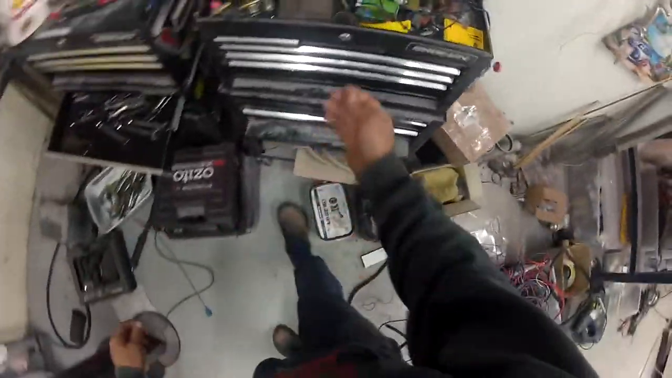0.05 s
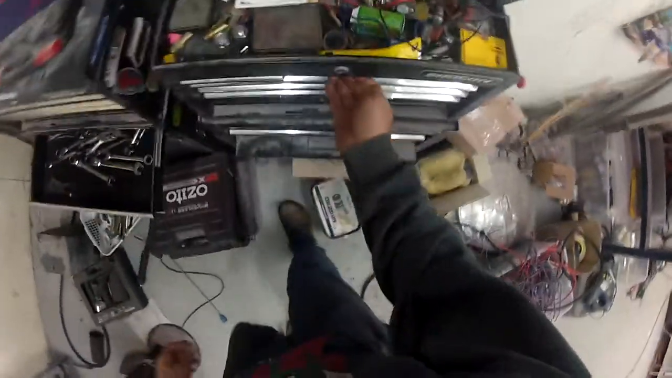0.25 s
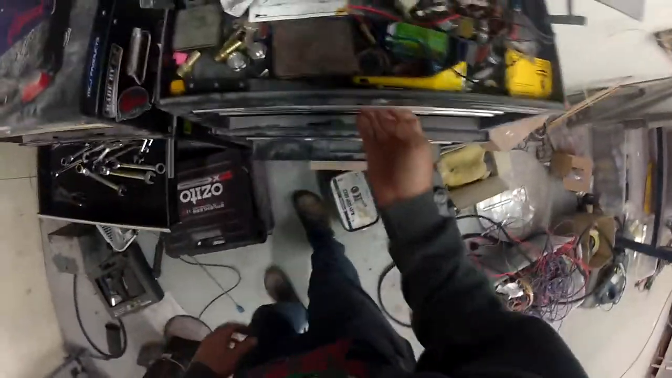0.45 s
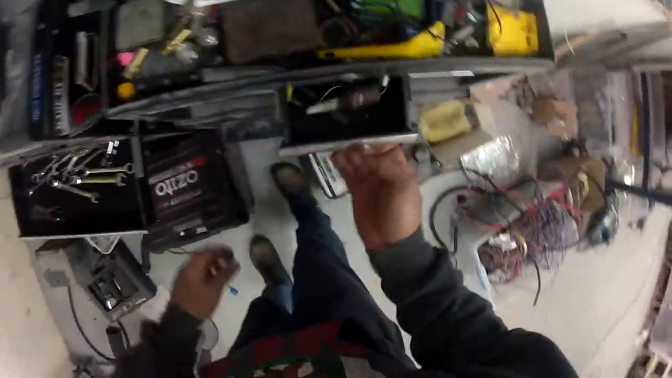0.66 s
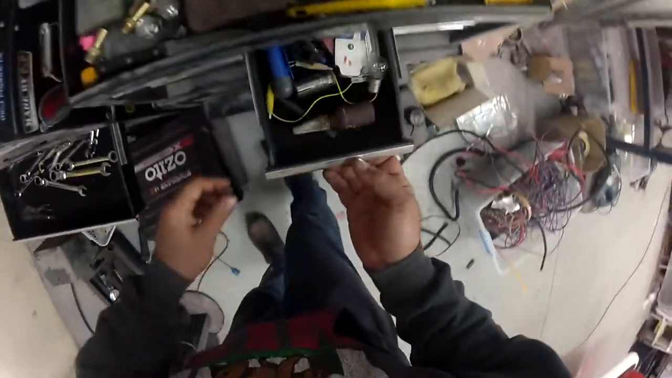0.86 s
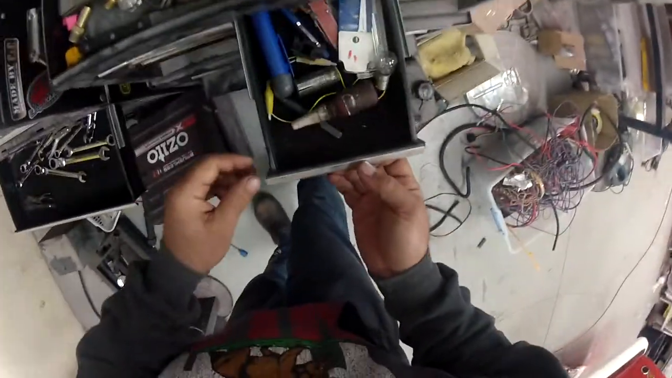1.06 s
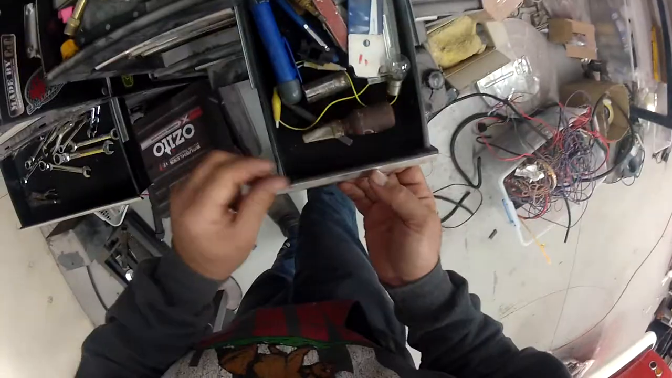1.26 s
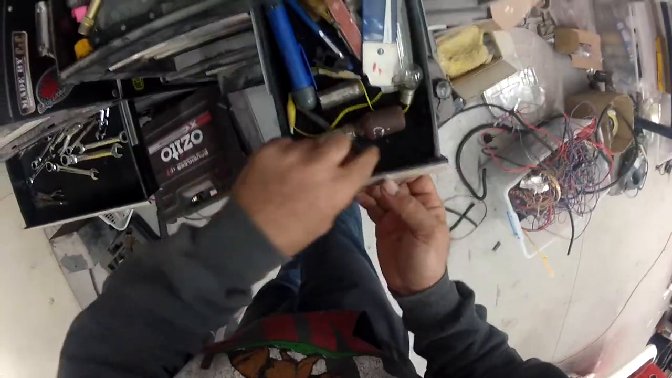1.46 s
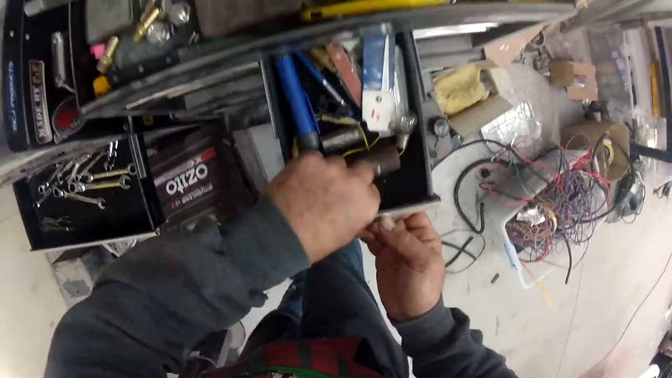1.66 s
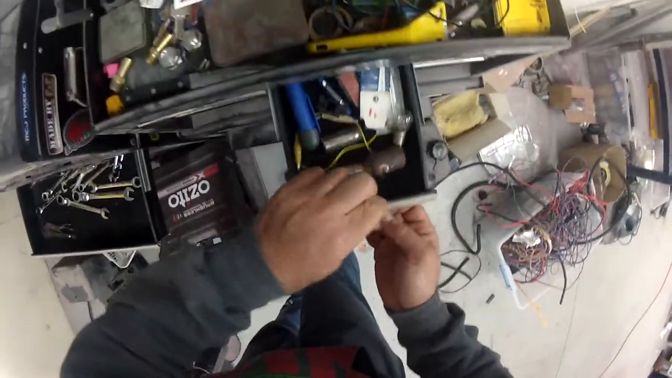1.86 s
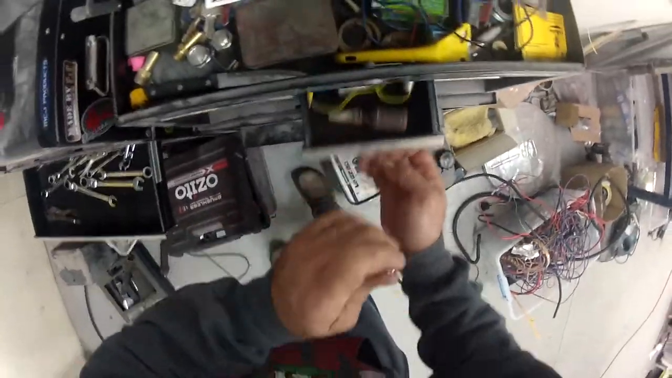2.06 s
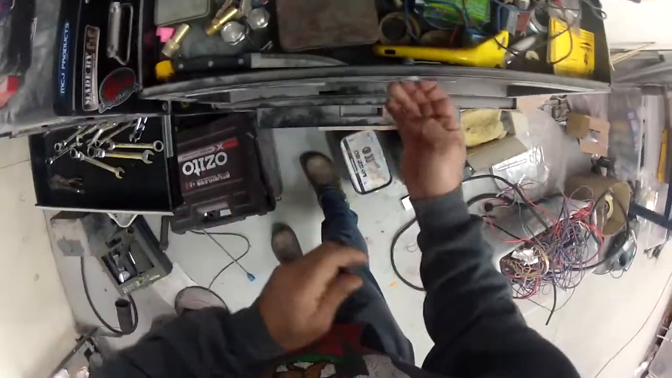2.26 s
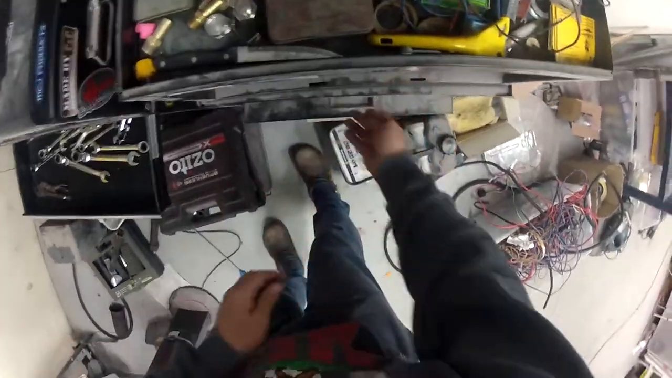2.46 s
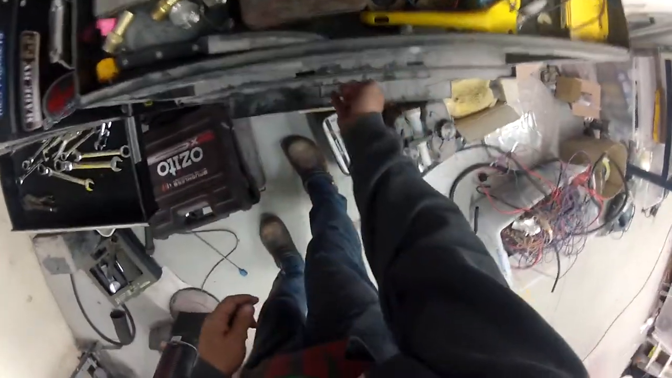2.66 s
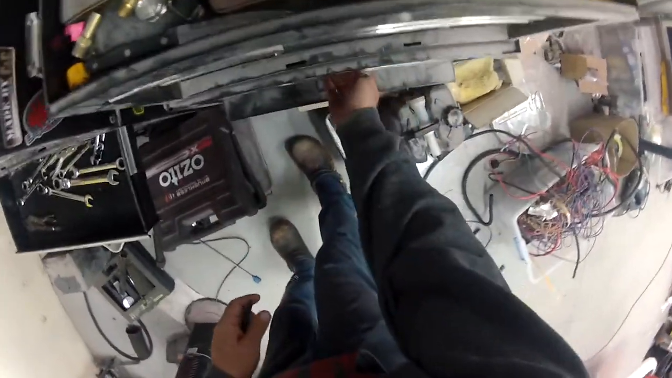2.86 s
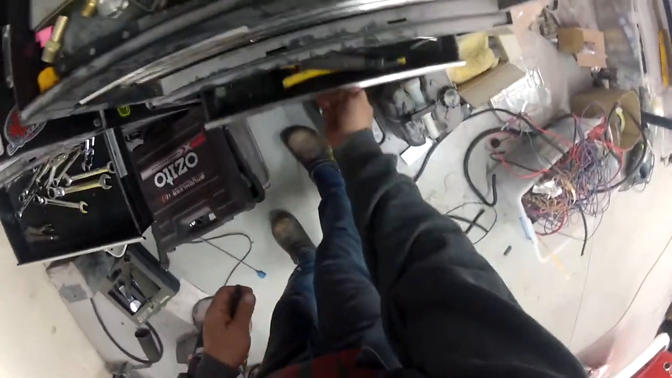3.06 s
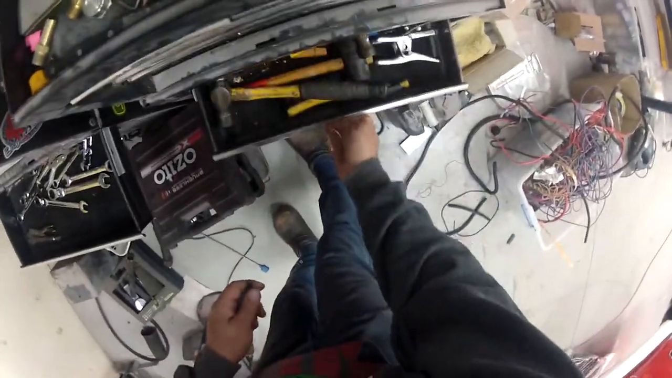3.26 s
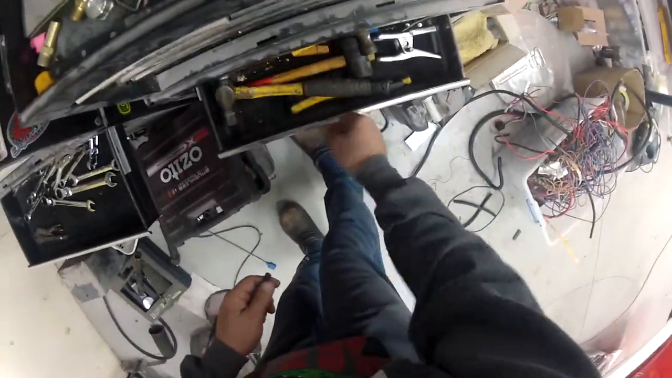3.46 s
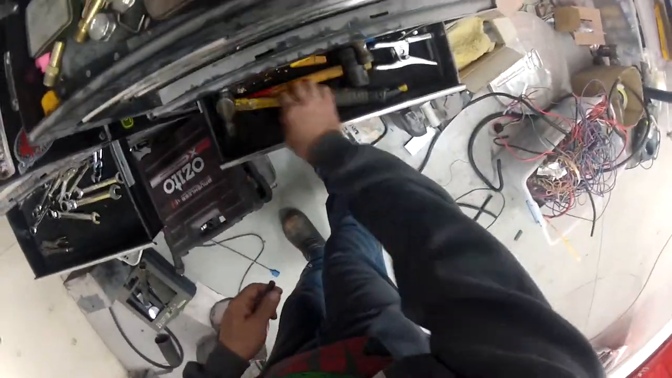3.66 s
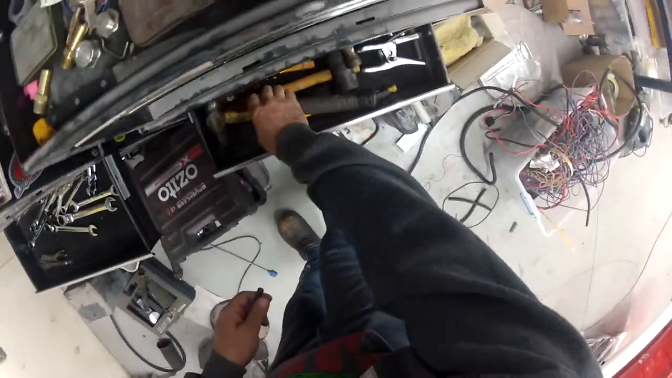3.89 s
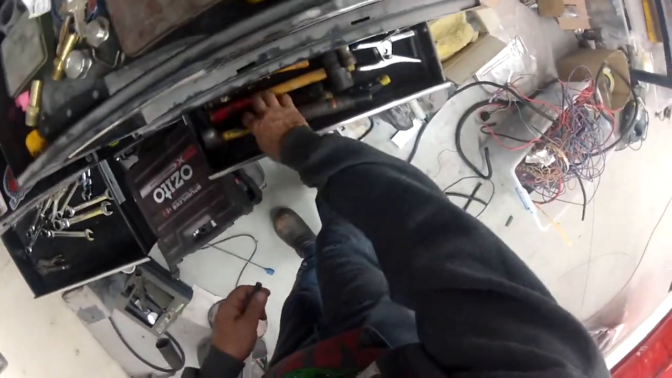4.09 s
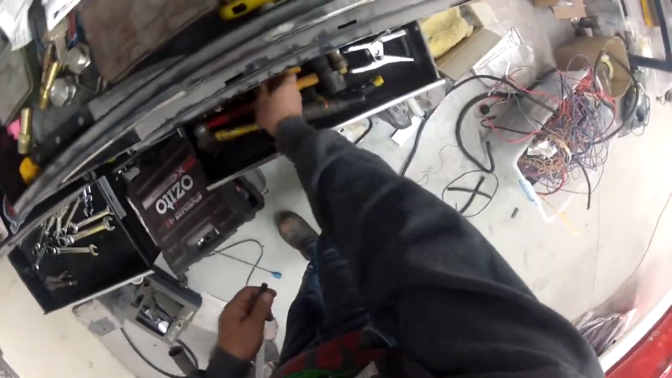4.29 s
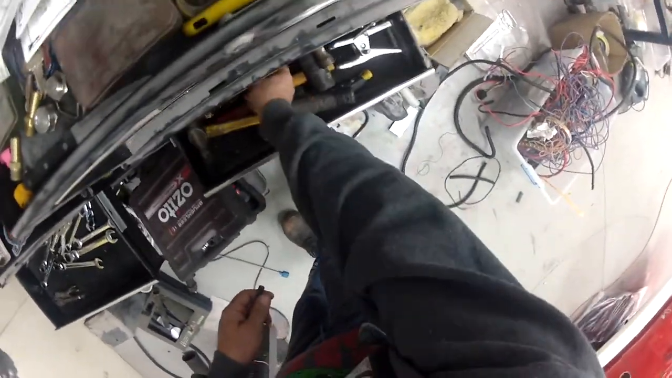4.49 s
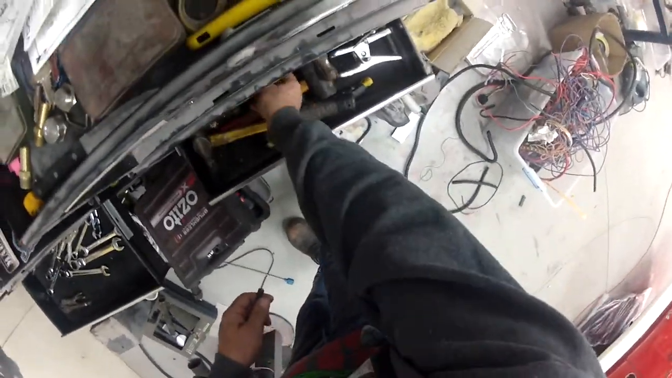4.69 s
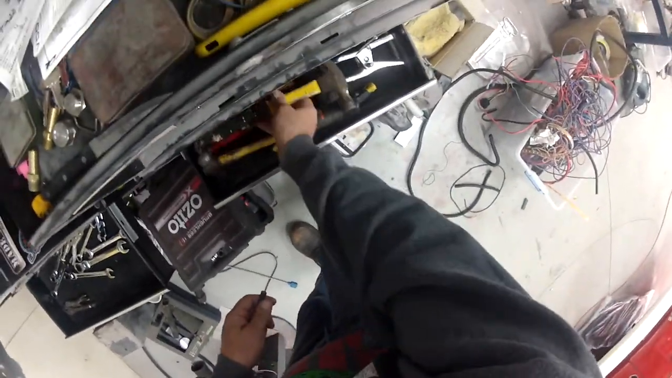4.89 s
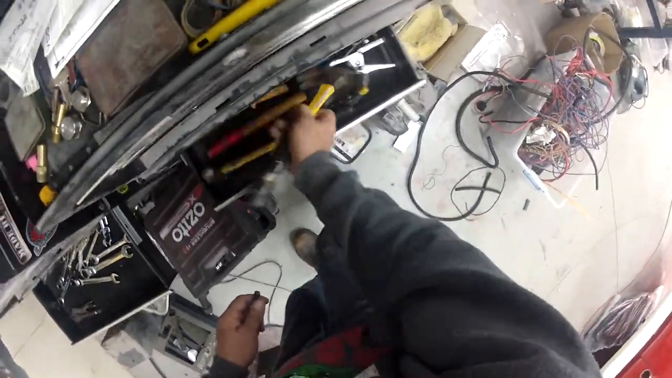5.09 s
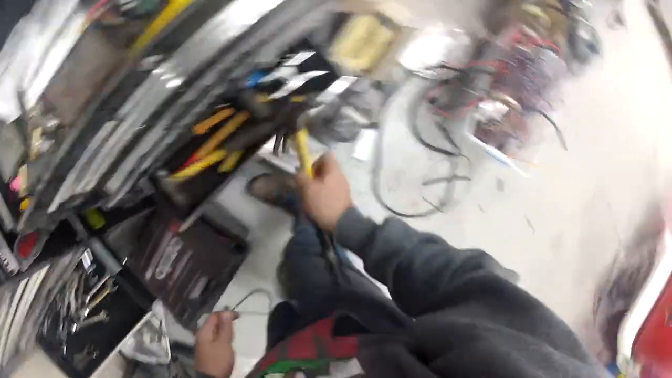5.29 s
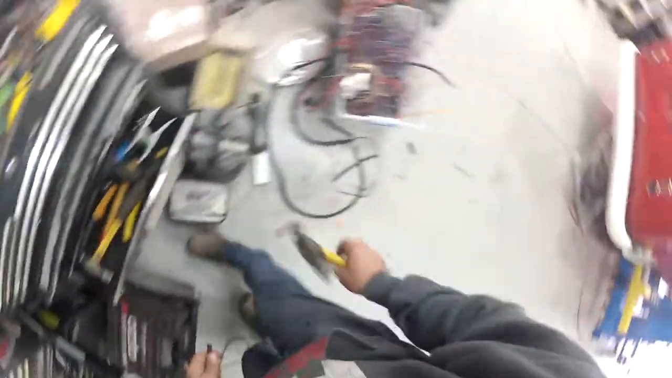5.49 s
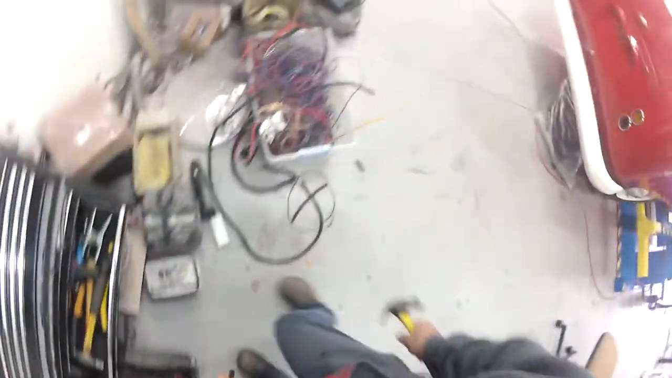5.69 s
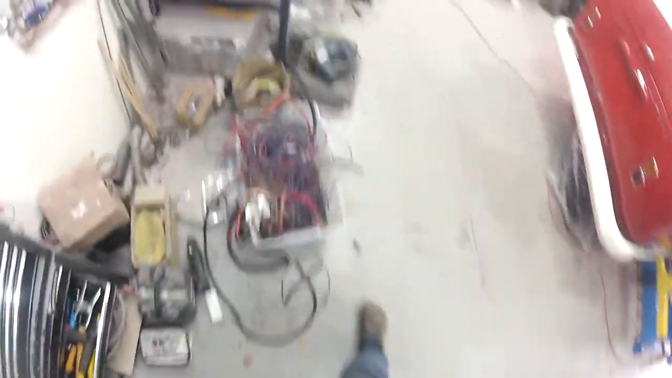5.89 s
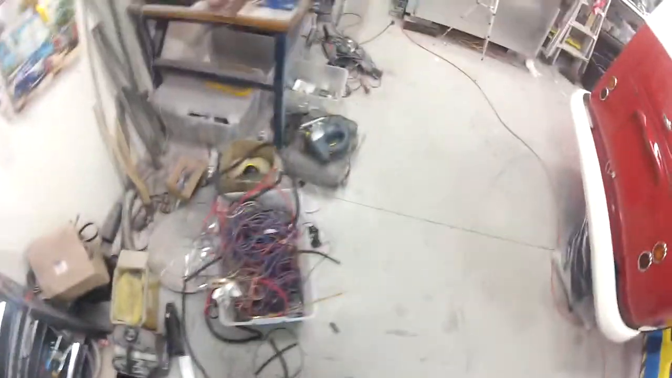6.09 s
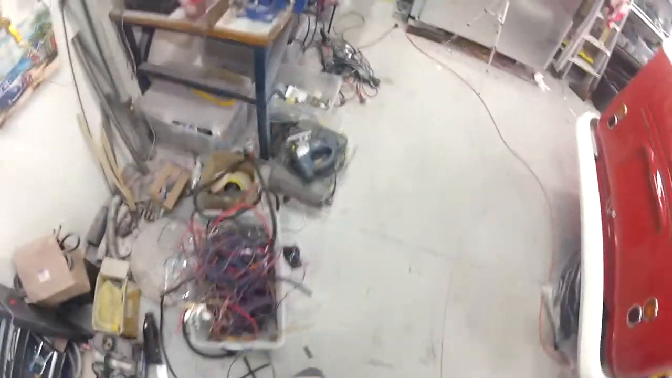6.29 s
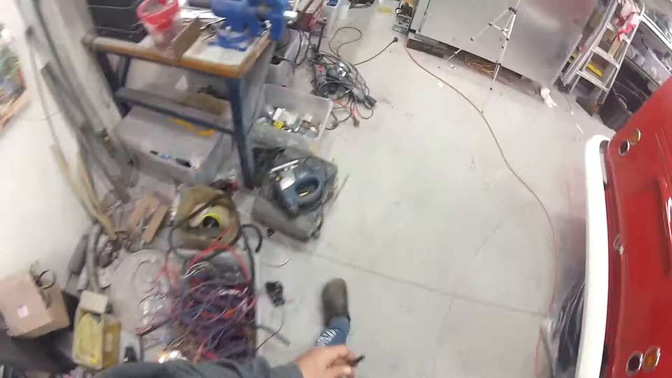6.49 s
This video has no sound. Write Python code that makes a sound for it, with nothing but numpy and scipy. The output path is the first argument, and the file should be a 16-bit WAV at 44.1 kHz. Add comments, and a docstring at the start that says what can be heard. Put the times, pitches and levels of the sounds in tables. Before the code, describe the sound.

Metal drawers roll and bang in a workshop, and hand tools knock and ring as someone rummages through them.

```python
"""Steel tool chest in a workshop

At the chest, within arm's reach: a small drawer rolls out on ticking ball runners, is searched and slams. A
wide drawer below rolls out, hammers knock about in it and one is lifted out; a shoe scuffs the floor. Each blow
thuds and sets sheet steel and tools ringing. The microphone is in a head-worn camera, which keeps only the band
below about 5.3 kHz and whose coarse sampling adds a glassy top."""
import sys
import numpy as np
from scipy import signal
from scipy.fft import rfft, irfft, next_fast_len
from scipy.io import wavfile

SR = 44100
rng = np.random.default_rng(int(sys.argv[2]) if len(sys.argv) > 2 else 0)


def wav_out(sig):
    """Save sig, one row per channel (or a flat mono array), as 16-bit PCM at SR to the path in sys.argv[1]."""
    wavfile.write(sys.argv[1], SR, np.round(np.clip(np.atleast_2d(sig).T, -1, 1) * 32767).astype(np.int16))


N = 288546

# Spectra, as relative level per hertz: f/Hz, level/dB
AIR_SPECTRUM = [(18, -51.5), (30, -6.5), (278, 2), (492, -8), (799, -11), (1330, -16.5), (1690, -25),
                (1800, -20.5), (1930, -17), (2060, -20), (5800, -26.5), (7540, -58), (12800, -120)]
HANDLING_SPECTRUM = [(40, -12), (95, -2), (200, -20.5), (400, -22), (900, -26.5), (2000, -55.5)]
SWISH_SPECTRUM = [(150, -5), (500, 4.5), (1100, -7), (1700, -8), (2400, 3.5), (3300, -3.5), (4600, -2.5),
                  (5800, -3.5)]
SMALL_TRAY_SPECTRUM = [(60, -46), (110, -13.5), (160, -23.5), (205, 2.5), (290, -22), (400, -3),
                       (510, -11.5), (690, 3.5), (830, -2), (1000, -17.5), (1150, -18.5), (1500, -31.5),
                       (2500, -58.5)]
WIDE_TRAY_SPECTRUM = [(26, -14), (45, -45), (87, -2), (134, -8.5), (176, 7.5), (219, 0.5), (253, -2.5),
                      (418, -4), (599, -2.5), (672, 2.5), (776, -9), (909, -19.5), (1400, -36.5),
                      (1820, -88), (3080, -120)]
GRIT_SPECTRUM = [(700, -11), (1000, -4.5), (1300, 0.5), (1800, 6), (2800, 4.5), (4200, 0), (5800, -2)]
KNOCK_SPECTRUM = [(45, -20), (70, -38.5), (100, 2), (170, -5), (240, -5), (380, 2.5), (480, 1), (720, 4),
                  (880, -12.5), (1100, -14), (1700, -16), (2900, -16.5), (4200, -21.5), (5800, -22)]
# Movements: start/s, rise/s, hold/s, fall/s, level/dB
CAMERA_SHIFTS = [(4.4, 0.19, 0.49, .08, -54.5), (5.33, 0.046, 0.2, 0.055, -46),
                 (5.68, 0.018, 0.04, 0.11, -52.5), (5.96, 0.064, 0.099, 0.03, -49),
                 (6.35, 0.07, 0.047, 0.042, -67)]
SLEEVE_AND_SHOE_MOVES = [(0.509, 0.027, 0.025, 0.016, -41), (1.5, .08, 0.2, 0.06, -72),
                         (3.9, 0.04, 0.18, .05, -70), (5.153, 0.11, 0.032, 0.045, -54.5),
                         (5.65, 0.061, 0.16, .05, -73.5), (5.86, 0.11, 0.072, 0.035, -66.5),
                         (6.050, 0.0025, 0.0061, 0.053, -49), (6.25, 0.071, 0.12, 0.054, -72),
                         (6.473, 0.058, .03, .03, -62.5)]
SMALL_DRAWER_PUSHES = [(.44, 0.036, 0.17, 0.035, -47.5), (.62, 0.043, .13, 0.067, -43.5),
                       (.92, 0.018, 0.088, 0.11, -46), (1.6, 0.084, 0.11, 0.038, -60.5),
                       (1.77, 0.063, 0.36, 0.014, -42)]
WIDE_DRAWER_PUSHES = [(2.93, 0.036, 0.052, 0.047, -32.5), (3.04, 0.086, 0.05, 0.12, -27)]
# Ring time of chest and room: f/Hz, t60/s
RING_T60 = [(60, 0.56), (200, 0.86), (560, 0.55), (1400, 0.42), (3000, 0.42), (5500, 0.38)]
# Modes of the drawer panels, the knocked tools and one loose tool: f/Hz, level/dB, t60/s
PANEL_MODES = [(98, -6, .8), (114, -7, .7), (169, -3, 1.0), (194, -4, 1.0), (243, -3, .8), (305, -4, .7),
               (353, -10, .8), (385, -6, .6), (555, -8, .9), (730, -5, .7), (930, -14, .5)]
TOOL_MODES = [(1291, -4, .6), (1449, -6, .5), (1927, -6, .5), (2336, -5, .6), (2694, 2, .6), (2815, -4, .5),
              (2998, -5, .5), (3161, -6, .6), (3771, -5, .6)]
LOOSE_TOOL_MODES = [(2280, -9, 0.25), (2460, 1, 0.083), (2460, -11, 0.18), (2720, -13, 0.22),
                    (2830, -10, 0.19), (3004, -3.5, 0.34), (3050, -10, 0.33)]
# Touches on a loose tool: t/s, level/dB, pitch ratio
TOOL_TOUCHES = [(0.24, -53.5, 1.005), (4.112, -50.5, .88)]
# Knocks of drawers and tools: t/s, level/dB, thud f/Hz, hardness (clank over level)/dB, clank f/Hz, ring/dB
KNOCKS = [ (.096, -50, 640, -6, 2500, -8.5), (.163, -30, 421, -10, 1940, -21),
          (0.168, -43, 107, -11, 1940, -14), (.24, -67, 600, 10.5, 2700, -3),
          (.463, -35.5, 303, -15.5, 2600, -7.5), (.490, -39, 384, -14, 2700, -19),
          (.737, -33.5, 756, -7, 1260, -15), (.778, -36, 737, -26, 1300, -25),
          (.868, -12, 331, -9, 900, -20), (1.267, -57, 593, 15, 2700, -41),
          (1.452, -24.5, 503, -10, 2480, -18.5), (1.793, -38, 402, -11, 1060, -7),
          (1.898, -42.5, 705, 7.5, 4130, -31), (2.121, -19, 812, -4, 1200, -20),
          (2.126, -20, 336, -11.5, 1050, -20), (2.161, -19, 62, 2, 1000, -30),
          (2.162, -10, 398, -12, 930, -11.5), (2.164, -16, 807, 0, 3000, -22),
          (2.187, -19, 323, -15, 2700, -12), (2.268, -23, 371, -13, 2650, -13),
          (2.300, -17.5, 342, -13.5, 2940, -6.5), (2.596, -45.5, 296, -15.5, 2980, -5.5),
          (2.669, -42, 398, -23, 2640, 5.5), (2.837, -27.5, 304, -19.5, 2500, -6),
          (2.956, -31, 489, -18.5, 2400, -11), (3.160, -28, 169, -10.5, 2500, -7),
          (3.867, -36, 224, -22, 2320, -4.5), (4.098, -35, 175, -23, 2620, 0.5),
          (4.115, -41.5, 428, -20.5, 2580, -0.5), (4.340, -45, 300, -18, 4540, -11),
          (4.441, -25.5, 557, 3, 2660, -19), (4.445, -34, 87, -24, 2680, 3),
          (4.450, -20.5, 483, -13, 2660, -10), (4.712, -39, 416, -18, 2700, -11),
          (4.734, -12.5, 260.4, -29.5, 2200, -8.5), (4.853, -27, 535, -19.5, 3080, -12.5),
          (4.873, -18, 241, -26, 2550, -11.5), (4.910, -23.5, 535, -20, 2530, -10.5),
          (4.956, -26.5, 197, -14.5, 2500, -5), (5.372, -32, 644, 2, 2900, -7.5),
          (5.38, -23, 98, -25, 2220, -17), (5.392, -18.5, 648, -14.5, 2000, -10),
          (5.412, -22.5, 560, 2, 2000, -19), (5.528, -33.5, 102, -14, 2700, -4),
          (5.755, -53.5, 203, 8.5, 3690, -23), (5.795, -55, 200, 6, 3750, -25),
          (6.38, -36.5, 232, -13.5, 2260, -15.5)]

BAND_EDGES_HZ = 40 * 2 ** (np.arange(23) / 3)
BANDS_HZ = np.sqrt(BAND_EDGES_HZ[1:] * BAND_EDGES_HZ[:-1])
TIME = np.arange(N) / SR


def from_db(db):
    """Decibels to gain."""
    return 10 ** (np.asarray(db) / 20)


def rms_one(x):
    """Scale each row to rms 1."""
    return x / np.sqrt(np.mean(x ** 2, axis=-1, keepdims=True) + 1e-20)


def at_hz(points, hz):
    """Read a table on a log-frequency axis."""
    f, value = np.transpose(points)
    return np.interp(np.log(hz), np.log(f), value)


def add(out, start_s, sound):
    """Mix a sound in at a time."""
    i = max(0, int(start_s * SR))
    out[i:i + len(sound)] += sound[:max(0, N - i)]


def band_noise(size):
    """Third-octave bands of noise, rms 1 each."""
    white = rng.standard_normal((2, size))
    bank = [signal.butter(2, edges, "band", fs=SR, output="sos").repeat(2, axis=0)
            for edges in zip(BAND_EDGES_HZ, BAND_EDGES_HZ[1:])]
    return rms_one(np.array([signal.sosfilt(sos, white[k % 2]) for k, sos in enumerate(bank)]))


def coloured(x, spectrum):
    """Give a steady texture a spectrum that falls away steeply past its last point; rms 1."""
    size = next_fast_len(N)
    hz = np.arange(size // 2 + 1) * SR / size + 1
    gain = from_db(at_hz(spectrum, hz)) / (1 + (hz / spectrum[-1][0]) ** 8)
    return rms_one(irfft(rfft(x, size) * gain, size)[:N])


def grains(per_s, spread_db):
    """Tiny contacts of uneven size at random moments."""
    sizes = from_db(spread_db * np.minimum(rng.exponential(1, N), 4)) * rng.choice([-1, 1], N)
    return sizes * (rng.random(N) < per_s / SR)


def strokes(moves, power=1):
    """Gain of movements that gather, hold and coast to rest, growing as a power of their speed."""
    gain = np.zeros(N)
    for start, rise, hold, fall, db in moves:
        gather = np.clip((TIME - start) / rise, 0, 1)
        coast = np.exp(-np.maximum(TIME - start - rise - hold, 0) / fall)
        gain += from_db(db) * (gather * coast) ** power
    return gain


def ring_shape(build_s):
    """Per band, a diffuse ring builds up and dies within a second; lows last longest."""
    t = TIME[:SR]
    return (1 - np.exp(-t / build_s)) * from_db(-60 * t / at_hz(RING_T60, BANDS_HZ)[:, None])


def ringing(modes, rise_s):
    """One decaying sine per mode, a second long."""
    hz, db, t60 = np.transpose(modes)[:, :, None]
    t = TIME[:SR]
    return from_db(db - 60 * t / t60) * np.sin(2 * np.pi * hz * t) * (1 - np.exp(-t / rise_s))


def room_air():
    """Room tone: the quiet, steady air of the workshop."""
    return from_db(-64.5) * coloured(rng.standard_normal(N), AIR_SPECTRUM)


def workshop(direct, wet_db):
    """Sound reaches the microphone directly, followed by the diffuse ring of the room."""
    tails = band_noise(2 * SR)[:, SR:] * ring_shape(build_s=0.0082)
    response = np.sqrt(np.diff(BAND_EDGES_HZ)) @ tails
    response *= np.sqrt(2 * BAND_EDGES_HZ[-1] / SR / np.sum(response ** 2))
    return direct + from_db(wet_db) * signal.fftconvolve(direct, response)[:N]


def camera_handling(resting_db=-67):
    """Right at the microphone, the camera stirs faintly and shifts as its wearer straightens and walks."""
    thumps = coloured(grains(per_s=340, spread_db=4), HANDLING_SPECTRUM)
    return (from_db(resting_db) + strokes(CAMERA_SHIFTS)) * thumps


def sleeve_and_shoe():
    """Rubbing surfaces catch and slip thousands of times a second."""
    return strokes(SLEEVE_AND_SHOE_MOVES) * coloured(grains(per_s=5900, spread_db=4), SWISH_SPECTRUM)


def loose_tool():
    """A light touch leaves a loose tool ringing freely; longer tools ring lower."""
    out = np.zeros(N)
    for start_s, db, pitch_ratio in TOOL_TOUCHES:
        modes = np.array(LOOSE_TOOL_MODES) * [pitch_ratio, 1, 1]
        add(out, start_s, from_db(db) * ringing(modes, rise_s=0.0049).sum(axis=0))
    return out


def drawer(pushes, tray_spectrum, grit_db, per_s, spread_db):
    """Balls tick along the runners and tools jiggle; these contacts shake the tray and give a gritty top."""
    contacts = grains(per_s, spread_db)
    rumble = strokes(pushes) * coloured(contacts, tray_spectrum)
    grit = strokes(pushes, power=1.17) * coloured(contacts, GRIT_SPECTRUM)
    return rumble + from_db(grit_db) * grit


def hammer_nudges(count=6, span_s=(4.5, 4), hardness_db=-15, clank_hz=4380, ring_db=-18):
    """The searching hand nudges hammers at random: light blows, as rows like those of KNOCKS."""
    slots = np.linspace(*span_s, count + 1)
    when, force, pitch = rng.random((count, 3)).T
    times = slots[:-1] + when * np.diff(slots)
    levels_db = -49 + 3 * (2 * force - 1)
    thuds_hz = 293 * 2 ** (0.6 * (2 * pitch - 1))
    return [(*nudge, hardness_db, clank_hz, ring_db) for nudge in zip(times, levels_db, thuds_hz)]


def by_register(hz, boom, panel, clank):
    """Pick a value by pitch: cabinet boom below, drawer panels between, clank of tools above."""
    return np.interp(np.log(hz), np.log([230, 330, 850, 1200]), [boom, panel, panel, clank])


def steel_bands():
    """Band gains of struck steel, with each register brought to about unit power."""
    power = from_db(at_hz(KNOCK_SPECTRUM, BANDS_HZ)) ** 2 * np.diff(BAND_EDGES_HZ)
    register_db = 10 * np.log10(np.bincount(np.digitize(BANDS_HZ, [280, 1000]), power))
    return np.sqrt(power) / from_db(by_register(BANDS_HZ, *register_db))


def excitation_db(hz, db, thud_hz, hardness_db, lowest_hz):
    """How strongly a blow drives each pitch: heavy ones boom, hard ones clank, small parts lack bass."""
    weight_db = 5 * np.log2(310 / thud_hz)
    cushion_db = 0.67 * max(-20 - hardness_db, 0)   # a soft contact, as of a rubber handle, spares the panels
    boom_db = db + min(weight_db, 0)
    panel_db = db - max(weight_db, 0) - cushion_db
    bass_loss_db = 10 * np.log10(1 + (lowest_hz / hz) ** 6)
    return by_register(hz, boom_db, panel_db, db + hardness_db) - bass_loss_db


def near(hz, octaves=0.19):
    """Band weights, 0-1, around a pitch that a struck part favours."""
    return np.exp(-(np.log2(BANDS_HZ / hz) / octaves) ** 2)


def impact(noise, band_gains, db, thud_hz, hardness_db):
    """A crack and a damped thud; the harder the contact, the sooner they fade."""
    t = TIME[:SR // 5]
    fade_s = 1 / (2 ** (hardness_db / 9.5) / 0.0056 + 1 / 0.042)
    burst = (1 - np.exp(-t / 0.0012)) * np.exp(-t / fade_s)
    crack = band_gains @ rms_one(noise[:, :len(t)] * burst) * np.sqrt(np.mean(burst ** 2))
    # however sharp the blow, a low thud takes a cycle or two to swell and die
    swell = (1 - np.exp(-t * thud_hz / 0.38)) * np.exp(-t / np.hypot(fade_s, 0.62 / thud_hz))
    thud = swell * np.sin(2 * np.pi * thud_hz * t)
    return from_db(-5) * crack + from_db(db + 2) * thud


def struck_modes(waves, db, scatter_db=4):
    """Every contact point excites its own mixture of the modes."""
    gains = from_db(db + scatter_db * rng.standard_normal(len(waves)))
    return (gains * rng.choice([-1, 1], len(waves))) @ waves


def knocks():
    """Each blow on drawer or tool gives an impact, a diffuse ring of sheet steel and a few clear modes."""
    out, noise = np.zeros(N), band_noise(3 * SR)
    steel, tails = steel_bands(), ring_shape(build_s=0.018)
    panels, tools = ringing(PANEL_MODES, rise_s=0.0012), ringing(TOOL_MODES, rise_s=0.0012)
    panel_hz = np.array(PANEL_MODES)[:, 0]
    for start_s, db, thud_hz, hardness_db, clank_hz, ring_db in KNOCKS + hammer_nudges():
        blow = db, thud_hz, hardness_db
        lowest_hz = min(0.72 * thud_hz, 190)   # bass ends below the thud, at most at a tray's cut-off
        focus_db = 3 * near(thud_hz) + 4 * near(clank_hz)
        band_gains = steel * from_db(excitation_db(BANDS_HZ, *blow, lowest_hz) + focus_db)
        offset = rng.integers(SR // 10, 2 * SR)
        dense_modes = noise[:, offset:offset + SR]
        bass_cut = signal.butter(2, lowest_hz, "high", fs=SR, output="sos")
        add(out, start_s, signal.sosfilt(bass_cut, impact(dense_modes, band_gains, *blow)))
        ring = band_gains @ (dense_modes * tails)
        ring += struck_modes(panels, excitation_db(panel_hz, *blow, lowest_hz) - 6)
        ring += struck_modes(tools, db + hardness_db - 18)
        add(out, start_s, from_db(ring_db) * ring)
    return out


def scene():
    """Close on the chest, in mono: knocks, rolling drawers and body movement over quiet room tone."""
    blows = knocks()
    small = drawer(SMALL_DRAWER_PUSHES, SMALL_TRAY_SPECTRUM, grit_db=-19, per_s=2400, spread_db=2)
    wide = drawer(WIDE_DRAWER_PUSHES, WIDE_TRAY_SPECTRUM, grit_db=-22.5, per_s=1900, spread_db=1.5)
    movement = workshop(small + wide + sleeve_and_shoe(), wet_db=-7)
    tings = workshop(loose_tool(), wet_db=-2.5)
    return (blows + tings + movement + camera_handling() + room_air())[None]


def sample_and_hold(x):
    """Sampling at 12 kHz and holding each value mirrors the sound faintly on both sides of 12 kHz."""
    at_48_khz = signal.resample_poly(x, 160, 147, axis=-1)
    held = np.repeat(at_48_khz[:, ::4], 4, axis=-1)
    return signal.resample_poly(held, 147, 160, axis=-1)[:, :N]


def record(dry):
    """Behind the microphone, the camera limits the band, samples coarsely and cuts the top."""
    band_limit = signal.butter(16, 5300, fs=SR, output="sos")
    top_cut = signal.ellip(8, .3, 70, 15300, fs=SR, output="sos")
    band_limited = signal.sosfilt(band_limit, dry)
    return signal.sosfilt(top_cut, sample_and_hold(band_limited))


dry = scene()
out = record(dry)
wav_out(out)
```